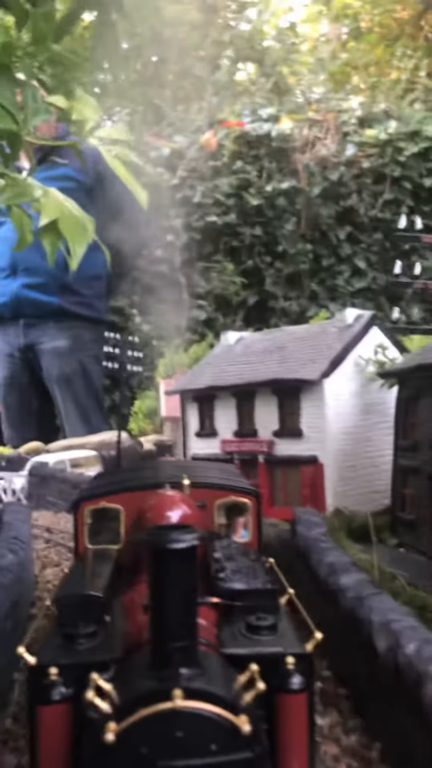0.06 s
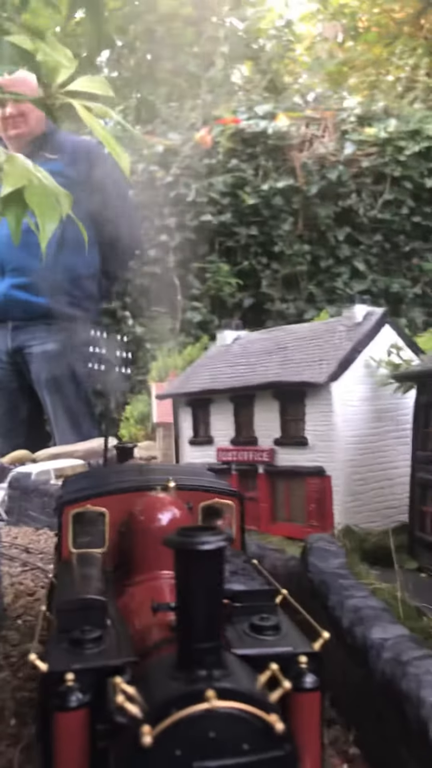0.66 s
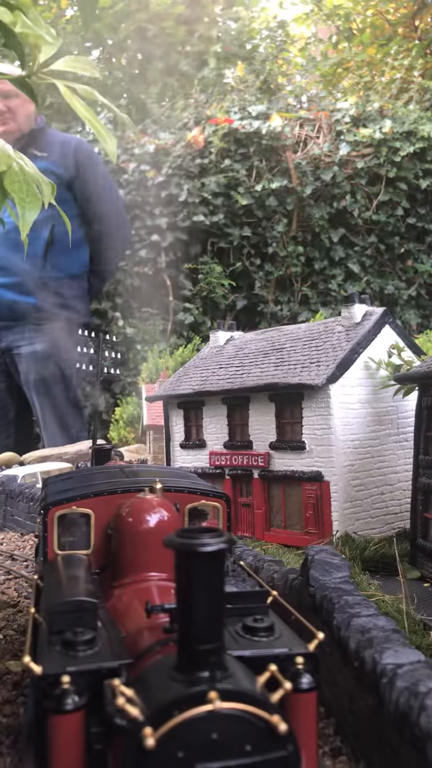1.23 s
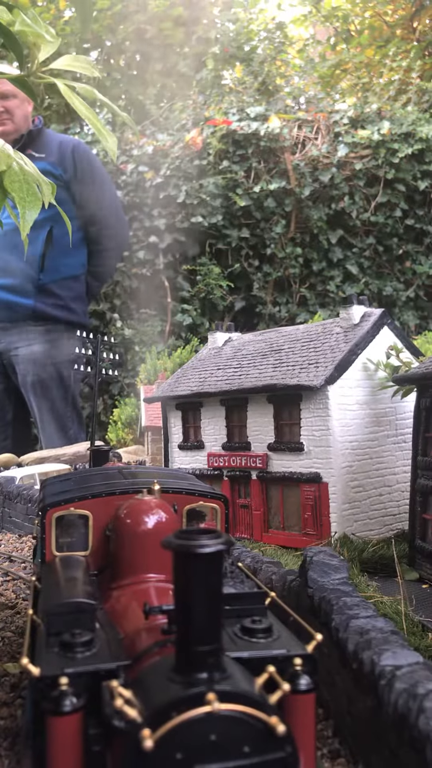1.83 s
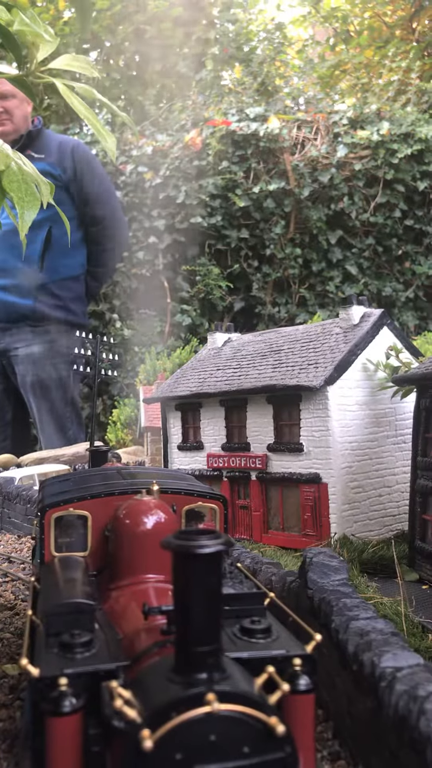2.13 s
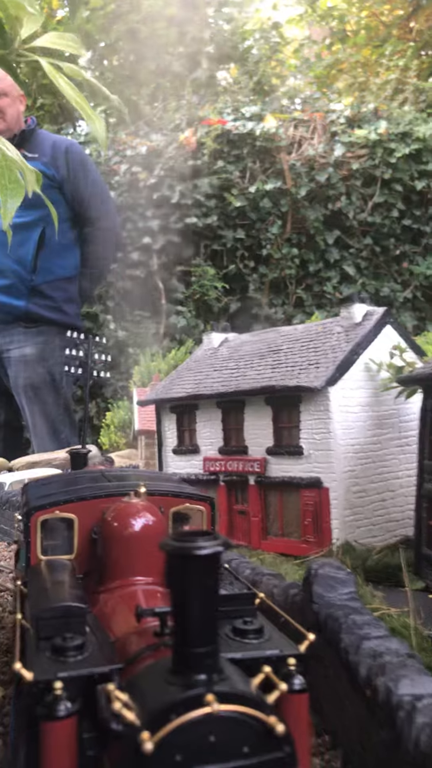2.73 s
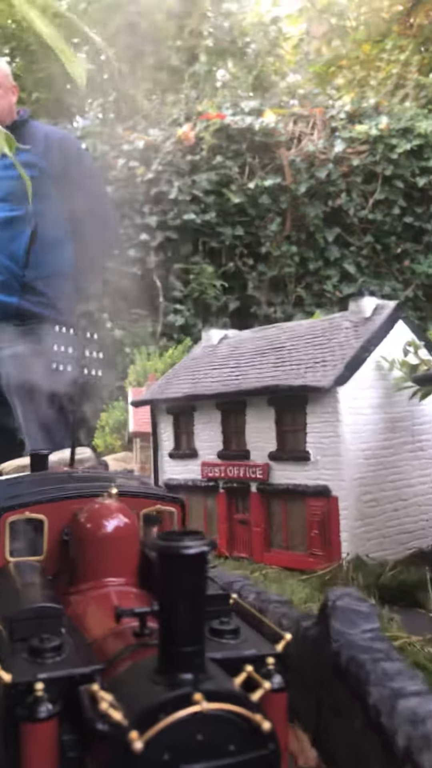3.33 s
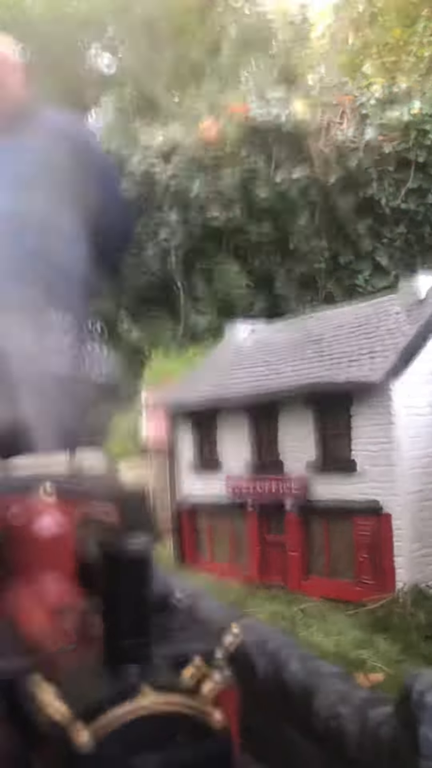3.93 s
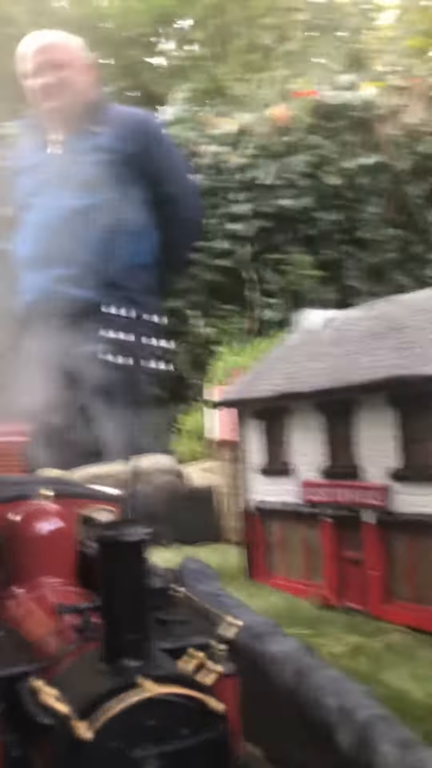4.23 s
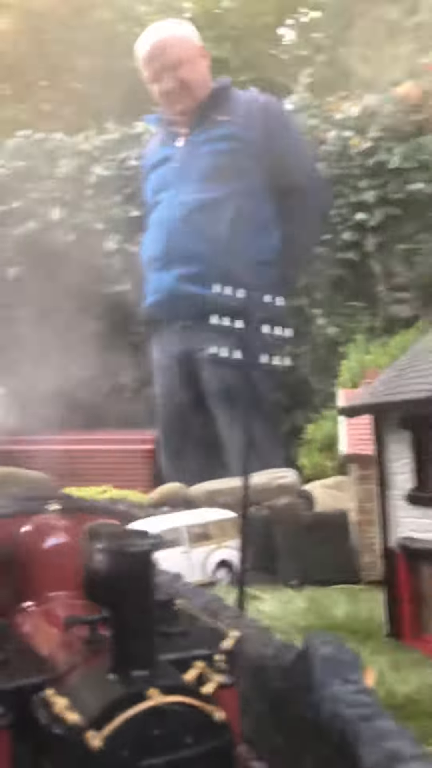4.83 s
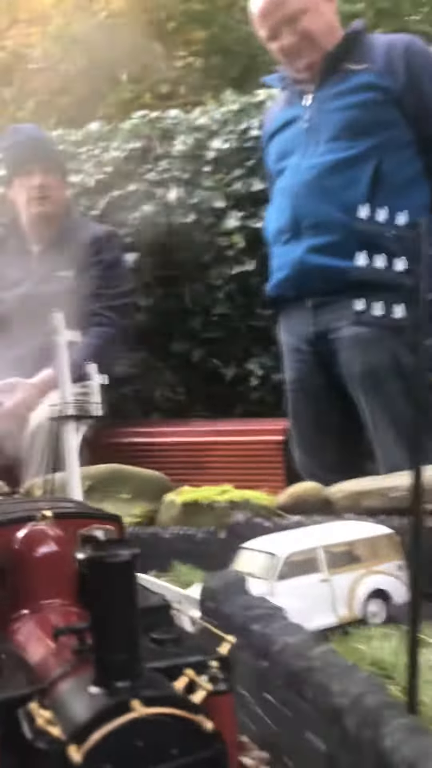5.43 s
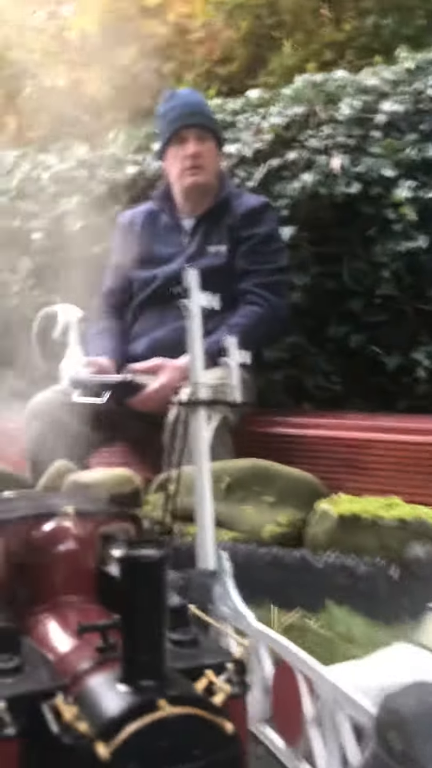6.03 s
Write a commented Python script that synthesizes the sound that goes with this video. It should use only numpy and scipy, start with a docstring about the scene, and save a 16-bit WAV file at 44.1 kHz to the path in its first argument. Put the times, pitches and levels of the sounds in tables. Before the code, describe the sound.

Heard very close in a garden, a miniature steam engine gives several light puffs, then coasts on a steady steam hiss, soft burner roar and low wheel rumble with dull knocks. A sharp spit of steam brings the beats back, louder and wetter, quickening into an even, bright chuffing. Loose brass fittings clink faintly, a far car pulls away quietly, and a few sharp rail clicks come near the end.

```python
"""Slow steam puffs ring the chimney of a small garden locomotive, the microphone riding just ahead of it.
They stop while the engine coasts, come back wet and spitting, then run quick and even into a bend.
Close under them a gas burner roars in its flue, leaking steam hisses, wheels rumble and knock and
loose brass clinks. Far beyond the garden a car pulls through two gears."""
import sys
import numpy as np
from scipy import signal
from scipy.fft import rfft, irfft
from scipy.io import wavfile
from scipy.ndimage import uniform_filter1d, map_coordinates

SR = 44100
rng = np.random.default_rng(int(sys.argv[2]) if len(sys.argv) > 2 else 0)


def dump_mix(stems):
    """Bounce the given channels to the path in sys.argv[1] as a 16-bit WAV at rate SR."""
    frames = np.atleast_2d(stems).T  # one column per channel
    limited = np.clip(frames, -1, 1)  # hard clip at full scale
    pcm = np.round(limited * 32767).astype(np.int16)
    wavfile.write(sys.argv[1], SR, pcm)


N = 271656
TIME = np.arange(N) / SR

# the far car's pull in each gear: full_s, end_s, rise_s, pitch_hz, climb_hz_per_s, level_db
CAR_GEARS = [(4.199, 4.6, .5, 116.4, 24, -42), (4.8, 6.159, .09, 86.15, 9.6, -40.5)]
# the train's pace through the garden: time_s, share_of_top_speed
TRAIN_SPEED = [(0, 0.32), (.6, 0.45), (1.5, 0.24), (2.3, 0.47), (3.2, 0.59), (4.5, 0.6), (6.16, 0.93)]
# spectrum of the rolling wheels: frequency_hz, gain_db
RUMBLE_SPECTRUM = [(40, -21), (75, 1), (110, 1.5), (150, 1), (220, 2.5), (290, -0.5), (370, -10),
                   (520, -14.5), (900, -17), (1450, -15.5), (2500, -26)]
# knocks from rail joints and couplings: start_s, knock_db, contact_ms, tick_db
WHEEL_KNOCKS = [(1.213, -24, 1.3, -50), (1.776, -26, 2, -37), (1.9, -20, 1.4, -50),
                (2.7148, -21.5, 0.75, -38), (5.447, -40, 0.33, -5.5), (5.709, -30.5, 0.23, -14),
                (5.8218, -27.5, 0.27, -8.5)]
# modes of the wheels and frames: pitch_hz, t60_s, level_db
FRAME_MODES = [(614, 0.035, -17), (880, 0.044, -5), (973, 0.037, -2), (1130, 0.022, 0.5), (1260, 0.057, -8),
               (1750, .02, -26)]
# spectrum of a knock's bright tick: frequency_hz, gain_db
TICK_SPECTRUM = [(700, -20), (1800, -18), (2600, -21), (3400, -2), (4800, 4), (6200, -21), (8300, 1.5),
                 (10000, -12), (12000, -5), (15000, -14)]
# taps of loose brass fittings: start_s, pitch_hz, level_db
BRASS_CLINKS = [(3.49, 2380, -34.5), (4.0552, 2335, -37), (4.917, 2790, -37)]
# spectrum of the gas flame: frequency_hz, gain_db
ROAR_SPECTRUM = [(60, -4), (200, -4.5), (380, 2), (560, -5.5), (740, 0), (900, 1), (1130, 2), (1230, -4.5),
                 (1330, -26.5), (1530, -10.5), (1760, -8), (2100, -12.5), (2700, -16), (4000, -34.5)]
# pipe resonances of the flue: multiple_of_lowest, width_hz, level_db
FLUE_RESONANCES = [(1, 90, 1.5), (1.78, 156, -7), (2.8, 225, -8)]
# spectrum of the leak, straight to the microphone: frequency_hz, gain_db
HISS_SPECTRUM = [(1300, -12), (2500, -6.5), (3600, -0.5), (4700, 8), (5120, -1), (5700, 5), (6750, 6),
                 (7700, -0.5), (9500, 6.5), (10500, -0.5), (11500, 2), (13200, 2.5), (14500, -4),
                 (15400, 7)]
# standing waves between boiler and tanks: pitch_hz, width_hz, level_db
TANK_GAP_MODES = [(2880, 980, -7), (3920, 670, 0.5), (4535, 580, -1.5), (5565, 460, 2), (6100, 330, 0.5),
                  (6695, 480, 3), (7170, 380, 0.5), (8310, 840, -0.5), (8740, 250, 1), (9330, 350, 2),
                  (9750, 200, 2), (10120, 300, 2), (10910, 200, -1), (11390, 300, 0), (12350, 230, -1.5),
                  (12470, 580, 1), (13500, 240, -8), (13700, 280, -3), (14300, 500, -2), (14700, 200, -1),
                  (15100, 550, 0)]
# resonances of the blast nozzle, rung by wet steam: pitch_hz, width_hz, level_db
NOZZLE_MODES = [(5230, 1150, -2.5), (9000, 1150, -7.5), (11280, 860, 0.5), (11970, 460, 4),
                (12870, 410, 2.5), (12700, 1000, -29.5)]
# resonances of the chimney: pitch_hz, width_hz, level_db
CHIMNEY_MODES = [(3461, 245, 3), (3222, 260, -4), (3654, 980, -8), (4630, 820, -7), (5080, 670, -11.5),
                 (6400, 2200, -22.5), (8130, 1660, -20.5)]
# exhaust beats: full_s, length_s, level_db, whistle_db (against the chimney's other resonances)
EXHAUST_BEATS = [(0.051, 0.029, -24, -4), (0.207, 0.038, -24, -1.5), (.443, .032, -24, 0.5),
                 (0.705, 0.051, -27, -5), (2.339, .065, -29, -5), (2.49, 0.024, -30.5, -24),
                 (2.726, .03, -25.5, -6), (2.759, 0.0209, -12.5, -10.5), (2.858, 0.033, -24.5, -10),
                 (3.01, 0.04, -26, -11), (3.086, 0.033, -15, -11), (3.267, 0.036, -17.4, -3),
                 (3.332, 0.024, -20, -5), (3.449, 0.048, -20, -3.5), (3.6, .046, -15, -5),
                 (3.748, 0.026, -18, -10), (3.879, 0.04, -14.5, 1), (3.999, 0.026, -18.5, -2.5),
                 (4.126, .042, -17, -2), (4.246, 0.025, -16.5, -3), (4.357, 0.032, -17, 2),
                 (4.474, 0.019, -19, 0.5), (4.584, .026, -18.5, -1), (4.708, 0.025, -21, 2),
                 (4.826, 0.036, -19.5, -4.5), (4.942, 0.018, -19, -5), (5.045, 0.019, -20, -1.5),
                 (5.174, 0.018, -20.5, 1.5), (5.286, 0.016, -18.5, 4.5), (5.399, 0.014, -20, 1),
                 (5.499, 0.0096, -19.5, 3), (5.618, 0.013, -21.5, -10), (5.71, 0.014, -23, -12),
                 (5.808, 0.013, -20.5, -7.5), (5.895, 0.011, -21, -9), (5.997, 0.017, -22, 1),
                 (6.08, 0.018, -20.5, -5.5)]


def undb(db):
    """Decibels to gain."""
    return 10 ** (np.asarray(db) / 20)


def unit(x):
    """Scale to rms 1."""
    return x / np.sqrt(np.mean(x ** 2))


def noise():
    """White turbulence."""
    return rng.standard_normal(N)


def wander(rate_hz):
    """Smooth random drift with rms 1."""
    span = max(int(SR / rate_hz), 2)
    return unit(uniform_filter1d(uniform_filter1d(noise(), span, mode="wrap"), span, mode="wrap"))


def swell(full_s, end_s, rise_s, fall_s):
    """Envelope 0-1: rises smoothly until full_s, holds until end_s, then dies away."""
    return np.exp(-(np.minimum(TIME - full_s, 0) / rise_s) ** 2 - np.maximum(TIME - end_s, 0) / fall_s)


def highpass(x, hz, order):
    """Remove what lies below hz."""
    return signal.sosfilt(signal.butter(order, hz, "high", fs=SR, output="sos"), x)


def colour(x, spectrum):
    """Causal filter with the given spectrum, built from the cepstrum."""
    hz, db = np.transpose(spectrum)
    bins_hz = np.maximum(np.fft.rfftfreq(16384, 1 / SR), 1)
    gain = undb(np.interp(np.log(bins_hz), np.log(hz), db))
    cepstrum = irfft(np.log(gain))
    half = len(cepstrum) // 2
    cepstrum[1:half] *= 2
    cepstrum[half + 1:] = 0
    return signal.fftconvolve(x, irfft(np.exp(rfft(cepstrum))))[:N]


def resonate(x, hz, width_hz):
    """A steep resonance: the same band-pass twice."""
    b, a = signal.iirpeak(hz, hz / width_hz, fs=SR)
    return signal.lfilter(b, a, signal.lfilter(b, a, x))


def moving_note(hz, width_hz):
    """Turbulence in a resonance whose centre follows hz."""
    lowpass = signal.butter(2, width_hz / 2, fs=SR, output="sos")
    wobble = signal.sosfilt(lowpass, noise() + 1j * noise())
    return unit(np.real(wobble * np.exp(2j * np.pi * np.cumsum(hz) / SR)))


def jet(modes, drops=0):
    """Turbulent steam and any drops it carries ring a set of resonances."""
    return unit(sum(undb(db) * resonate(noise() + drops, hz, width) for hz, width, db in modes))


def speed():
    """The train's speed as a share of its top speed."""
    return np.interp(TIME, *np.transpose(TRAIN_SPEED))


def bend(middle_s=3.725, turn_s=0.42):
    """How far the bend has swung the microphone off the line of the boiler, 0-1."""
    return .5 + .5 * np.tanh((TIME - middle_s) / turn_s)


def far_car():
    """Only the low exhaust note carries into the garden; it climbs steadily in each gear."""
    out = np.zeros(N)
    for full_s, end_s, rise_s, hz, climb_hz_per_s, db in CAR_GEARS:
        note_hz = (hz + climb_hz_per_s * (TIME - full_s)) * (1 + 0.0032 * wander(22))
        pull = swell(full_s, end_s, rise_s, fall_s=.12)
        out += undb(db) * pull * np.sin(2 * np.pi * np.cumsum(note_hz) / SR)
    return out * undb(wander(4.3))


def wheels(top_rumble_db=-37.5, top_boom_db=-43):
    """Rolling shakes the wagon and makes its body boom, more so with each doubling of speed."""
    doublings = np.log2(speed())
    rumble = undb(top_rumble_db + 5 * doublings) * unit(colour(noise(), RUMBLE_SPECTRUM))
    boom = undb(top_boom_db + 3 * doublings) * unit(resonate(noise(), hz=56.4, width_hz=27))
    return rumble + boom


def knocks(tick_decay_s=0.002):
    """Rail joints and couplings knock the frames; a longer contact sounds duller."""
    age = TIME[:SR // 10]
    ring = sum(undb(db - 60 * age / t60) * np.sin(2 * np.pi * hz * age) for hz, t60, db in FRAME_MODES)
    thuds, ticks = np.zeros(N), np.zeros(N)
    for start_s, knock_db, contact_ms, tick_db in WHEEL_KNOCKS:
        push = np.sin(np.pi * np.minimum(1000 * age / contact_ms, 1)) ** 2
        span = slice(int(start_s * SR), int(start_s * SR) + len(age))
        thuds[span] += undb(knock_db) * signal.fftconvolve(ring, push / push.sum())[:len(age)]
        ticks[span] += undb(tick_db) * np.exp(-age / tick_decay_s) * rng.standard_normal(len(age))
    return thuds + colour(ticks, TICK_SPECTRUM)


def clinks(t60_s=0.098):
    """Loose brass fittings tap and ring briefly, each on one note."""
    out = np.zeros(N)
    for start_s, hz, db in BRASS_CLINKS:
        age = np.maximum(TIME - start_s, 0)
        out += undb(db - 60 * age / t60_s) * np.sin(2 * np.pi * hz * age)
    return out


def burner(roar_db=-39, flue_db=-44.5, flue_rest_hz=628.4):
    """The gas flame roars unevenly and sounds its flue; both are weaker with the microphone aside."""
    draught = speed() ** 3.2  # fast running draws the fire harder
    roar = unit(colour(noise(), ROAR_SPECTRUM)) * undb(roar_db + 5.5 * draught - 3 * bend())
    flue_hz = flue_rest_hz * (1 + .2 * draught)  # the hotter flue rings sharper
    flue = sum(undb(db) * moving_note(k * flue_hz, width) for k, width, db in FLUE_RESONANCES)
    flicker = undb(1.36 * wander(61))
    return (roar + flue * undb(flue_db - 9 * bend())) * flicker


def steam_leak(hiss_db=-32.5, coasting_change_db=-8.5, bend_change_db=4, hollow_db=-30.5):
    """A thin hiss reaches the microphone directly and, until the bend, from between boiler and tanks."""
    coasting = swell(full_s=.8, end_s=2.35, rise_s=.5, fall_s=.35)  # the regulator is shut
    direct_db = hiss_db + coasting_change_db * coasting + bend_change_db * bend()
    direct = undb(direct_db) * unit(colour(noise(), HISS_SPECTRUM))
    hollow = undb(hollow_db) * (1 - bend()) * jet(TANK_GAP_MODES)
    return direct + hollow


def trackside_echoes(hiss, count=3, open_share=.13, house_share=.42, sound_m_per_s=343):
    """Close scenery returns echoes whose wandering delays colour the hiss, most beside a model house."""
    beside_house = swell(full_s=3.1, end_s=4.5, rise_s=.45, fall_s=1.4)
    share = open_share + (house_share - open_share) * beside_house
    out = hiss
    for k in range(count):
        detour_m = 0.2252 + 0.1673 * k + 0.026 * wander(2.27)
        echo = map_coordinates(hiss, [(TIME - detour_m / sound_m_per_s) * SR], order=3)
        out = out + share * echo
    return out / np.sqrt(1 + count * share ** 2)


def droplets(per_second, spread_db):
    """Random impacts of water drops, a few much larger than the rest."""
    size = undb(spread_db * np.minimum(rng.exponential(size=N), 4))
    hits = rng.random(N) < per_second / SR
    return unit(hits * size * np.sign(noise()))


def nozzle_spray(beats, drops, dry_db=-12, wet_boost_db=7):
    """Water condensed while coasting spits through the nozzle on each beat; then the cylinders dry."""
    wet = swell(full_s=3.16, end_s=3.8, rise_s=0.43, fall_s=0.88)
    return beats * undb(dry_db + wet_boost_db * wet) * jet(NOZZLE_MODES, .5 * drops)


def chimney_singing(flow, pitch_hz=3504, build_s=0.018, onset_db=-24):
    """The jet locks onto the chimney's lowest note just after the flow starts, and saturates."""
    memory = np.exp(-1 / (build_s * SR))
    built_up = signal.lfilter([1 - memory], [1, -memory], flow)
    lock = np.tanh(built_up / undb(onset_db))
    level_db = -28.5 - 17 * speed() ** 2.7  # quick beats break the note up
    return undb(level_db) * lock * moving_note(pitch_hz * (1 + .006 * wander(7)), width_hz=84)


def chimney_whistle(beats, pitch_hz=4643):
    """The chimney's upper note wanders, and a harder blast sharpens it."""
    blast = (beats / beats.max()) ** 2
    return moving_note(pitch_hz * (1 + .013 * wander(8) + .035 * blast), width_hz=266)


def beat_powers():
    """Each beat swells as the valve opens, holds, and dies as the cylinder empties."""
    body_power, whistle_power = 0, 0
    for full_s, length_s, db, whistle_db in EXHAUST_BEATS:
        puff = swell(full_s, full_s + 0.55 * length_s, rise_s=0.61 * length_s, fall_s=1.1 * length_s)
        power = (undb(db) * puff) ** 2
        body_share = 1 / (1 + undb(whistle_db) ** 2)
        body_power += power * body_share
        whistle_power += power * (1 - body_share)
    return body_power, whistle_power


def exhaust(blow_by_db=-11.5, blow_by_whistle_db=-8, blow_by_span_s=0.33):
    """Spent steam rings the chimney just behind the microphone; between beats some blows by the valves."""
    body_power, whistle_power = beat_powers()
    beats = np.sqrt(body_power + whistle_power)
    span = int(blow_by_span_s * SR)
    nearby_power = np.abs(uniform_filter1d(uniform_filter1d(beats ** 2, span), span))
    blow_by_power = undb(blow_by_db) ** 2 * nearby_power
    flow = np.sqrt(body_power + blow_by_power)
    whistle_flow = np.sqrt(whistle_power + blow_by_power * undb(blow_by_whistle_db) ** 2)
    drops = droplets(per_second=3900, spread_db=4)
    steam = flow * jet(CHIMNEY_MODES, 0.18 * drops)
    whistle = whistle_flow * chimney_whistle(beats)
    blast = steam + whistle + chimney_singing(flow) + nozzle_spray(beats, drops)
    flutter = undb(wander(190))
    # little sound leaves the narrow chimney below its lowest note
    return highpass(flutter * blast, hz=3040, order=10)


def scene():
    """The close engine and the far car meet at one microphone, alike in both channels."""
    mono = exhaust() + trackside_echoes(steam_leak()) + burner() + wheels() + knocks() + clinks()
    mono += far_car()
    return np.array([mono, mono])


def record(dry, top_hz=15700):
    """The recorder drops the deepest rumble, clips at full scale and cuts the top."""
    clipped = np.clip(highpass(dry, hz=39, order=5), -1, 1)
    return signal.sosfilt(signal.ellip(12, .1, 90, top_hz, fs=SR, output="sos"), clipped)


dry = scene()
out = record(dry)
dump_mix(out)
```